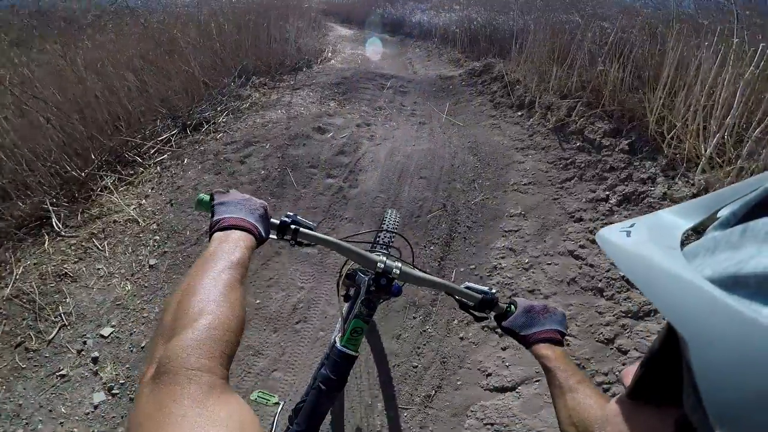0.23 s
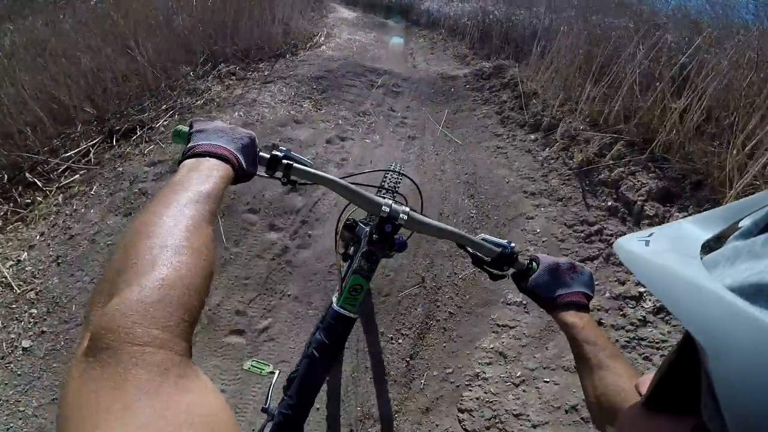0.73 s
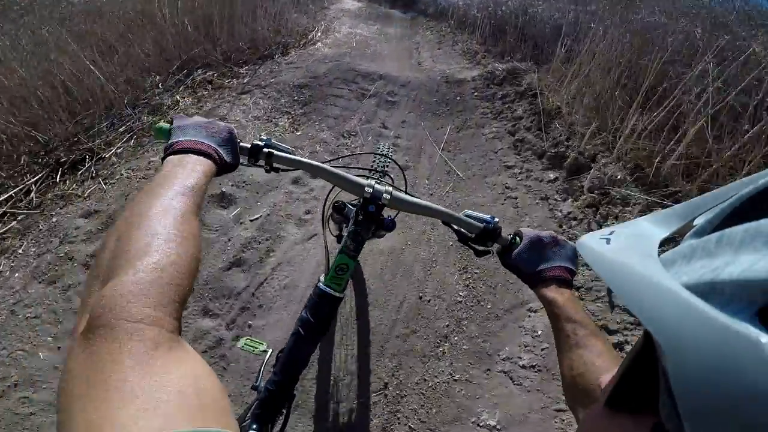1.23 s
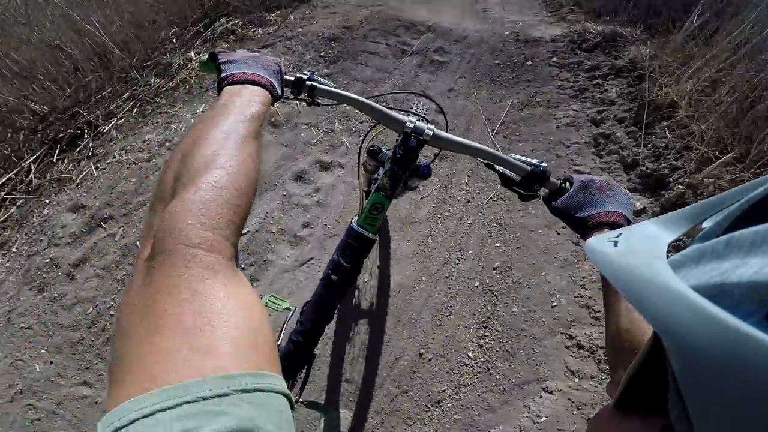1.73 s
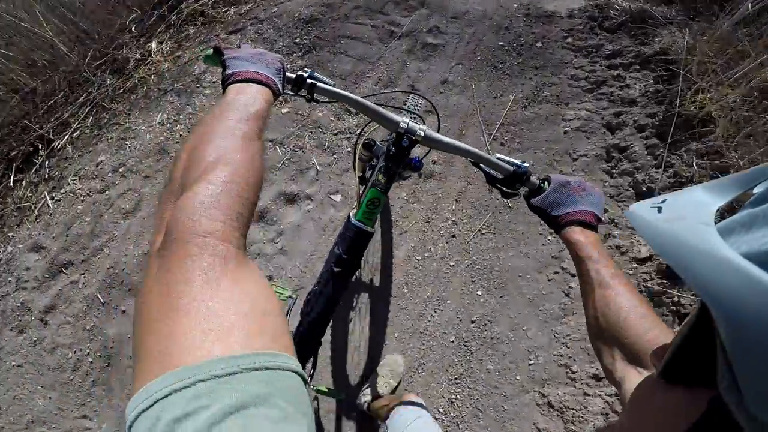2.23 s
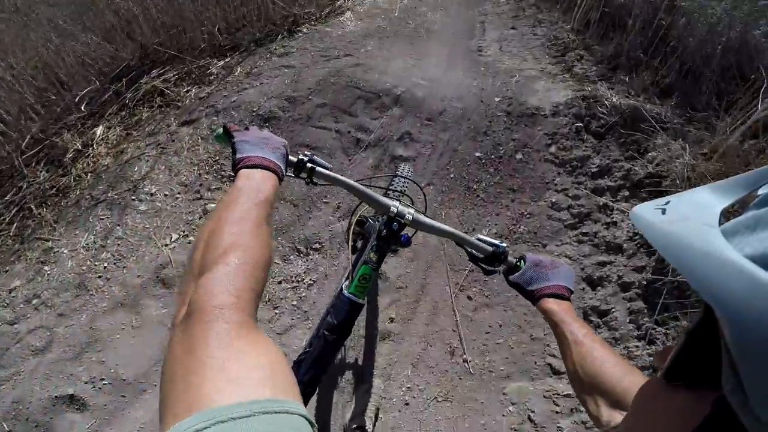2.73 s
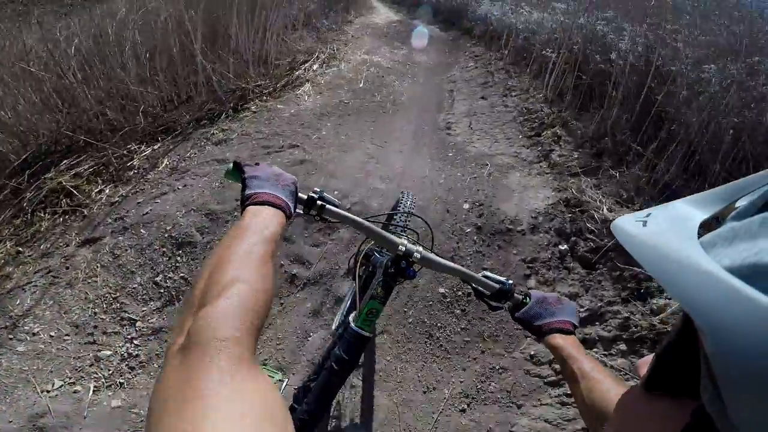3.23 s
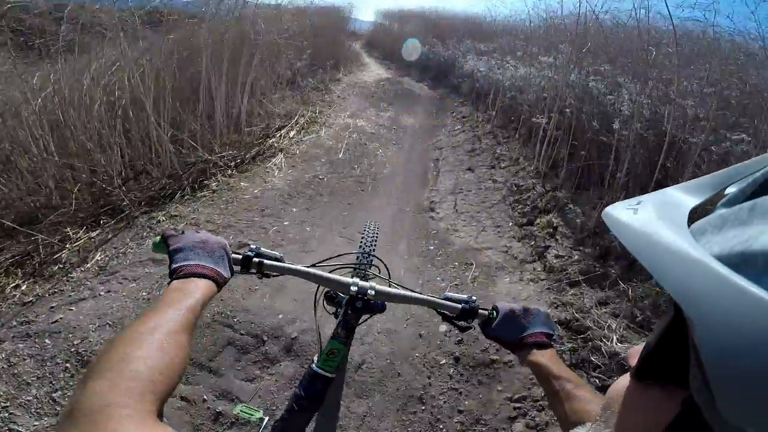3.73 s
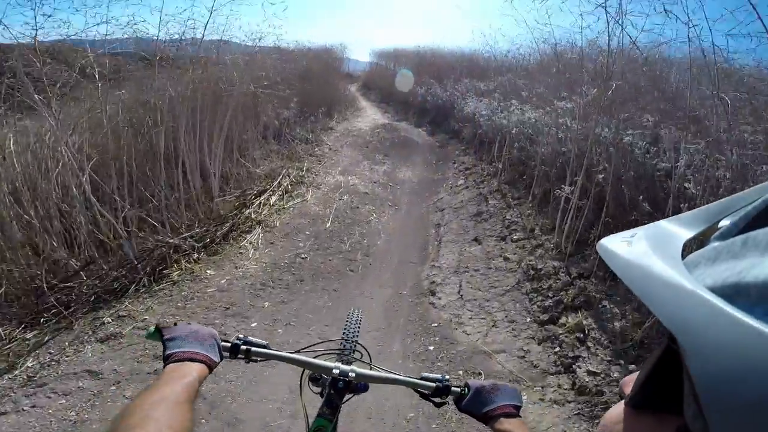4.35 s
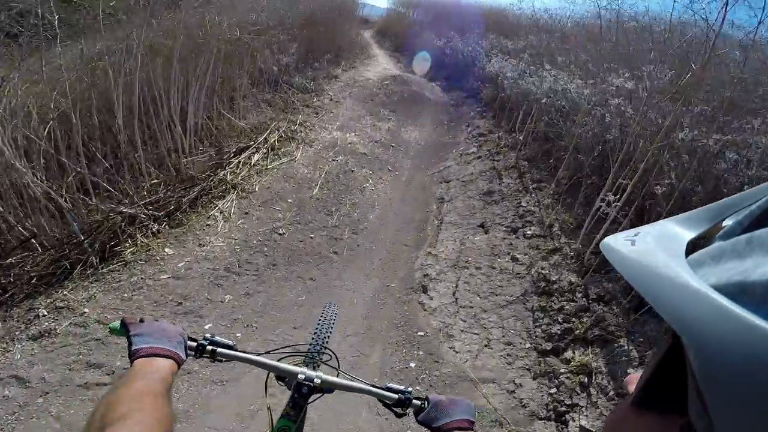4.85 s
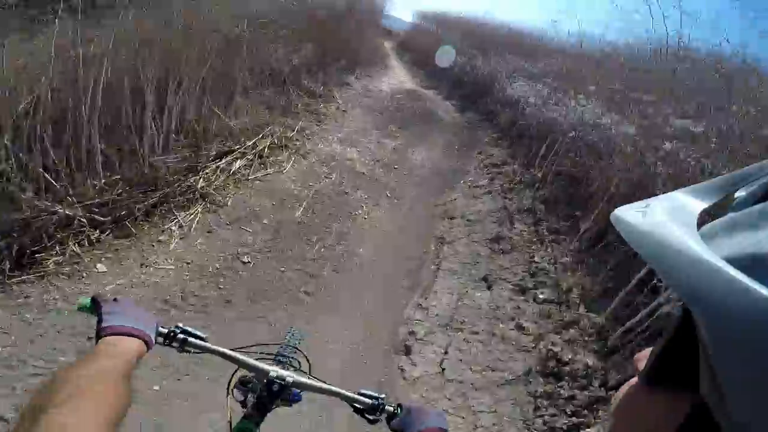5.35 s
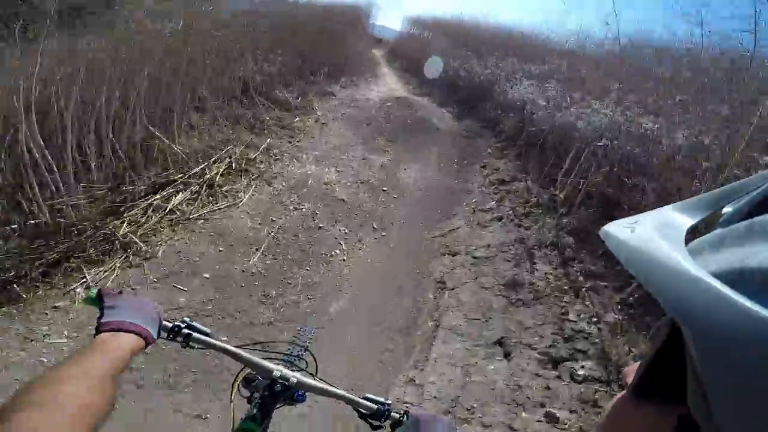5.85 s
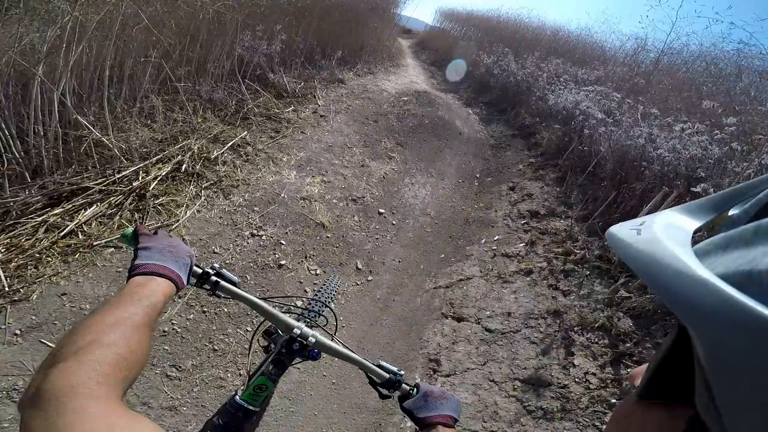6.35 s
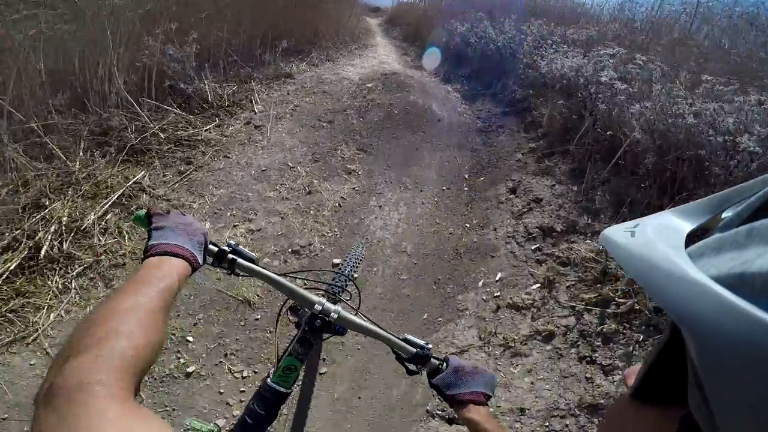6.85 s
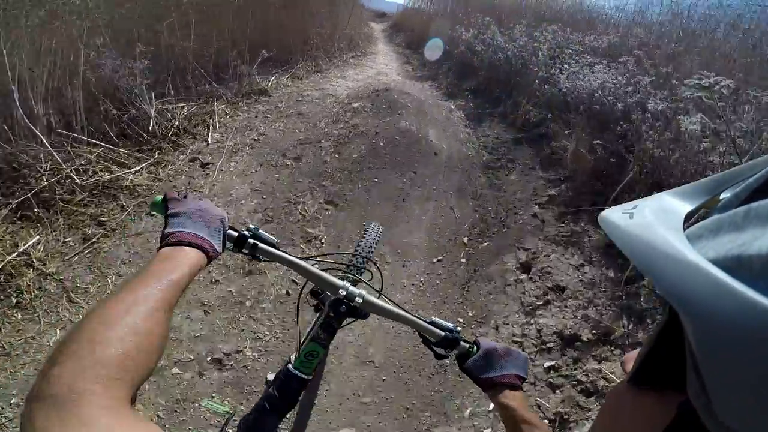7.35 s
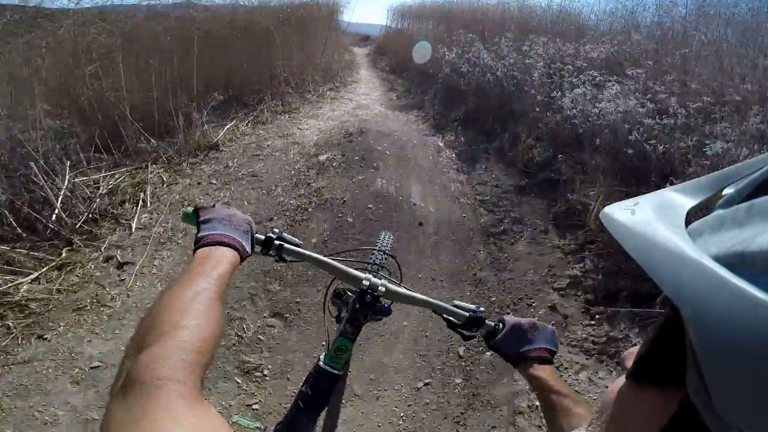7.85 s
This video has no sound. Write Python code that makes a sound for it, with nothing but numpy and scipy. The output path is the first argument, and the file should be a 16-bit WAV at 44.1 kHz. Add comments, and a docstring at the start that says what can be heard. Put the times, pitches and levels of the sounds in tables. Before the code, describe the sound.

On board a coasting bicycle, bright metallic ratchet clicks slow, quicken and slow again over faint gritty tyre noise, dull rattling knocks and buffeting wind.

```python
"""A bicycle freewheel ticks as a mountain bike coasts slowly down a dry dirt trail, heard from on board.
Each pawl drop is a snap of noise plus fading tones for the ringing hub and wheel.
Puffs of noise in a broad resonance are stones and cables knocking the frame; lumpy noise in three
pitch ranges is the tyres on grit. Wind heaves and buffets in low noise, with single pressure thumps."""
import sys
import numpy as np
from scipy import signal
from scipy.fft import rfft, irfft, next_fast_len
from scipy.io import wavfile
from scipy.ndimage import uniform_filter1d, map_coordinates

SR = 44100
rng = np.random.default_rng(int(sys.argv[2]) if len(sys.argv) > 2 else 0)


def materialize(psi):
    """Save the field psi as 16-bit PCM at rate SR to the path in sys.argv[1].

    A 1-D psi becomes a single channel; in a 2-D psi each row is a channel.
    """
    bounded = np.clip(np.atleast_2d(psi).T, -1, 1)
    quanta = np.round(bounded * 32767).astype(np.int16)
    wavfile.write(sys.argv[1], SR, quanta)


N = 357210  # length in samples

# freewheel pace: (time [s], pace [ticks per second])
TICK_PACE = [(0.0, 39.124), (0.775, 36.117), (1.425, 19.039), (1.65, 19.536), (1.75, 14.946),
             (1.95, 16.225), (2.425, 21.023), (2.55, 25.538), (2.725, 36.66), (2.825, 35.291),
             (3.125, 37.746), (3.2, 41.451), (3.625, 19.143), (3.75, 20.905), (4.2, 10.847),
             (4.425, 15.423), (4.5, 11.865), (4.85, 11.213), (5.225, 19.006), (5.475, 26.989),
             (5.575, 36.036), (5.75, 41.986), (5.8, 24.87), (5.95, 32.035), (6.125, 49.647), (6.3, 46.289),
             (6.65, 45.414), (7.35, 39.506), (7.525, 35.867), (7.8, 38.55), (8.1, 32.804)]
FIRST_TOOTH = .339  # share of a tooth's travel left before the first tick
# loudness of the ticks before their scatter: (time [s], snap level [dB], wheel ring level [dB])
TICK_LOUDNESS = [(0.0, -26, -42.5), (0.25, -34, -46), (0.95, -27.5, -48), (1.55, -35.5, -50),
                 (1.7, -31, -50.5), (2.25, -27, -43.5), (2.6, -37.5, -53), (2.8, -33.5, -47.5),
                 (3.25, -29, -47), (3.45, -28.5, -45), (3.75, -38, -53.5), (4.35, -31, -52),
                 (5.2, -41, -57), (5.45, -42.5, -50), (5.8, -36, -51), (6.15, -41.5, -51.5),
                 (6.4, -41, -53.5), (6.65, -32, -46.1), (6.8, -30, -49.5), (7.35, -39.5, -53.5),
                 (7.8, -28, -47), (8.1, -30.5, -49.5)]
STRONG_PAWL_DB = 0.5  # ticks lie this much above and below their level in turn
SNAP_SCATTER_DB, RING_SCATTER_DB = 1.0, 2.5  # from tooth to tooth
# ticks out of the even run; the extra replaces their random scatter:
# (time [s], delay [ms], extra snap [dB], extra wheel ring [dB])
ODD_TICKS = [(0.062, 2.5, -1.5, -4.5), (0.165, 1, 4, 5.5), (0.213, -2, 3.5, 2.5), (0.264, -2.5, 3.5, -2.5),
             (0.429, 1.5, -4.5, -11), (0.508, 1.8, -5, -2), (0.673, 4, 2.5, -2), (0.757, 5, 1, 1.0),
             (0.932, 5.4, -1.5, 2), (0.994, 4, 1.5, 9), (1.031, 7.2, 1.5, 4), (1.094, 1.2, 1.5, 7),
             (1.133, 3.5, 4, 7), (1.166, -1.5, -2, 5), (1.207, 0, 2.5, 8.5), (1.292, -0.2, 2.5, 1),
             (2.016, 1.5, 1, -3.0), (2.074, 0.5, -0.5, -4), (2.13, 0.6, -1, 3), (3.135, 2, 2, 5.0),
             (3.6, 2.7, 1.5, 1.5), (3.7, 0.7, 1.5, -3.0), (4.102, 1.5, 0.0, 6), (4.273, 2, 0, -0.5),
             (4.347, 0.4, 0, 4), (4.417, 3, 1, -17), (4.487, 1.2, 0.5, 4), (4.574, 3.5, 3.5, 2.5),
             (4.658, 1, 1.5, 7.5), (4.833, 1.9, -1, -0.5), (6.629, 3.3, 0, -2), (6.778, -2, 0.5, -6),
             (6.897, 1.8, 3.5, 4.0), (6.968, 4, -2.5, -1), (7.154, 0, -1, -13), (7.35, -4.5, 3, 5.5),
             (7.46, 1.3, -1, 5), (7.491, 6.5, 0.5, -2), (7.576, 8.5, 2, 0.0), (7.657, 7.5, 1.5, -4),
             (7.76, 4, -2.0, 3.5), (7.89, 1.5, -0.5, 8.5), (7.978, 7, 0.5, 5.5), (8.063, 5.5, -0.5, 2.5)]
# colour of the snap: (frequency [Hz], relative level per Hz [dB])
SNAP_COLOUR = [(400, -23.5), (1200, -23.5), (2500, -22.5), (3500, -11.5), (6200, -4.5), (6600, -1),
               (9000, -0.5), (13500, -5.5), (14300, -0.5), (14900, -4.5), (15500, -46), (16500, -52)]
# tones of the metal hub and cassette: (frequency [Hz], relative level [dB], time to fade 60 dB [s])
HUB_TONES = [(4255, -23, .2), (5400, -24, .07), (6000, -22, .07), (6650, -16, .12), (6869, -18, .06),
             (8193, -17, .05), (8790, -4, .06), (9351, -14, .06), (10360, -17, .08), (11200, -17, .12),
             (11900, -16, .06), (12800, -18, .11), (14270, -15, .15)]
# duller tones of the wheel: (frequency [Hz], relative level [dB], time to fade 60 dB [s])
WHEEL_TONES = [(1705, -12.5, 0.034), (2220, -5.5, 0.033), (2434, 2, 0.091), (2571, -5.5, 0.22),
               (2732, 3, 0.055), (1982, -8, 0.11)]

# knocks on the frame: (time [s], level [dB], centre [Hz], width [frequency ratio], kept within limits below)
FRAME_KNOCKS = [(.455, -42, 345, 4.8), (.499, -43, 380, 4.7), (0.902, -43, 427, 3.5), (.986, -33, 384, 2.5),
                (1.035, -26, 560, 1.3), (1.227, -36, 480, 2.4), (1.454, -22, 1660, 1.5),
                (1.526, -35, 450, 3.5), (1.541, -38, 700, 3), (2.097, -40, 307, 4.8),
                (2.143, -33.5, 450, 4), (2.431, -34, 530, 4.7), (2.758, -28, 704, 1.4),
                (3.215, -44, 1310, 2), (3.273, -49, 813, 1.8), (3.843, -47, 1040, 2.3),
                (4.085, -48.5, 700, 4), (4.292, -29, 1790, 1.5), (4.456, -40, 814, 2.2),
                (5.18, -49, 1150, 4.5), (5.23, -36, 304, 4.9), (5.734, -35, 1270, 4.4),
                (5.792, -42, 366, 5), (6.241, -43, 320, 5.4), (6.313, -20, 516, 2.9),
                (6.571, -48, 982, 1.9), (6.738, -41, 764, 4.1), (6.829, -43, 1260, 1.4),
                (7.132, -46, 1940, 2.9), (7.275, -37, 342, 4.3), (7.452, -37, 2190, 2.8),
                (7.644, -40, 2020, 1.8), (7.738, -38, 540, 2.1), (7.834, -33, 413, 2.4)]
MIDDLE_KNOCK_DB, MIDDLE_KNOCK_T60 = -36, 0.069  # a middling knock, and its time to fade 60 dB [s]
SHORTER_PER_DB = 0.11  # hard knocks die sooner
KNOCK_RISE_S = 0.0043  # for a knock at 500 Hz; higher ones start faster

# tyre loudness before its random sway: (time [s], crunch [dB], roll [dB], fine grit [dB])
TYRE_LOUDNESS = [(0.0, -58, -57.5, -48.5), (0.34, -59, -63.5, -55), (0.83, -56.5, -59, -51),
                 (1.2, -58.5, -59.5, -55), (1.58, -59.5, -61.5, -61), (1.98, -60.5, -62, -56.5),
                 (2.61, -55.5, -60, -58.5), (3.0, -55, -61.5, -54.5), (3.36, -51.5, -56.5, -52),
                 (3.7, -58.5, -60, -60), (3.95, -60, -61, -63.5), (4.29, -58, -56.5, -60.5),
                 (5.03, -64.5, -64, -65.5), (5.5, -60.5, -62.5, -61), (5.77, -58, -59, -57),
                 (6.11, -56.5, -64, -60), (6.56, -57.5, -57.5, -58), (6.75, -51.5, -59, -55.5),
                 (7.38, -59.5, -60, -58.5), (8.1, -53.5, -60, -52)]
# colour of the rolling tread: (frequency [Hz], relative level per Hz [dB])
ROLL_COLOUR = [(90, -15), (160, 0.5), (300, 1.5), (480, -2), (900, -47)]
# colour of the crushed dirt: (frequency [Hz], relative level per Hz [dB])
CRUNCH_COLOUR = [(250, -26), (600, 0.5), (1400, -1), (1700, 1), (2200, -5.5), (3000, -13), (6000, -68)]
# colour of the fine grit: (frequency [Hz], relative level per Hz [dB])
GRIT_COLOUR = [(1500, 3), (3000, 3), (6000, 1.5), (9000, -3), (14500, -8), (15500, -42)]

# wind on the microphone before its random sway: (time [s], buffet [dB], heave [dB])
WIND_LOUDNESS = [(0.0, -43.5, -34), (1.13, -50.5, -36.5), (1.26, -50, -36), (1.58, -50, -50),
                 (1.8, -51.5, -34), (2.12, -50, -38), (2.3, -47, -27), (2.57, -53.5, -42.5),
                 (3.07, -53, -35), (3.27, -50, -31), (3.47, -47, -27.5), (3.68, -53, -43),
                 (4.2, -47.5, -36), (4.46, -51.5, -29), (5.03, -58.5, -48), (5.32, -52, -27),
                 (5.53, -57, -42.5), (5.75, -50, -40), (5.91, -49.5, -38.5), (6.7, -49, -31.5),
                 (6.79, -50, -27.5), (7.76, -46.5, -35.5), (7.9, -39.5, -24.5), (8.1, -42.5, -39)]
# colour of the slow pressure heaves: (frequency [Hz], relative level per Hz [dB])
HEAVE_COLOUR = [(2, -8), (7, 0), (15, -5), (28, -14), (70, -40)]
# colour of the buffeting: (frequency [Hz], relative level per Hz [dB])
BUFFET_COLOUR = [(12, -23), (30, -4), (60, -6.5), (110, -15), (220, -34.5), (500, -54)]
# colour of torn, fluttering air: (frequency [Hz], relative level per Hz [dB])
FLUTTER_COLOUR = [(70, -11), (150, 6), (280, -3), (600, -17)]
# single blows: (time [s], peak before levelling off [dB], width scale [ms], push 1 or suction -1 [sign])
WIND_THUMPS = [(.197, -24.5, 10, 1), (0.556, -13, 6.9, 1), (0.878, -21, 17, -1), (.983, -13, 9.9, 1),
               (1.264, -23.5, 26, 1), (1.556, -5.5, 7.8, 1), (1.581, -16, 9.7, -1), (1.622, -22, 7.3, 1),
               (2.107, -30, 10, 1), (2.801, -19.5, 23, -1), (3.304, -21.5, 11.6, 1),
               (3.944, -18.5, 10.4, 1), (4.394, -26, 5.9, 1), (4.792, -31.5, 6.5, -1), (5.24, -17, 5.9, 1),
               (5.249, -16.5, 8.5, -1), (5.287, -20, 11.5, 1), (5.802, -22, 19, -1), (5.93, -23.5, 18, -1),
               (6.211, -16.5, 27, -1), (6.275, -20.5, 9.9, -1), (6.319, -15, 3.6, 1),
               (7.383, -7.5, 18.6, 1), (7.796, -16, 20, 1)]
# membrane pops inside one strong blow: (time [s], signed step [amplitude], recovery time constant [s])
MEMBRANE_POPS = [(7.3911, -0.071, 0.022), (7.433, 0.093, 0.0012)]
HEAVE_SWAY_DB = 2  # random sway of the slow pressure
TORN_DB = -18.5  # flutter that rides on the buffeting, against the buffet level
FLUTTER_DB, SURGE_DB, SURGE_S = -35, -12, 0.04  # torn air and slow surge around a blow, against its peak
TOP_HZ = 16494  # nothing higher is kept


def freewheel():
    """Each pawl drop is a sharp snap with a chattering tail that sets hub and wheel ringing."""
    out, t = np.zeros(N), np.arange(4096) / SR
    drops = ticks()
    rise = 1 - np.exp(-t / 0.00021)
    swell = 1 - np.exp(-t / 0.00014)  # the wheel takes a moment to respond
    crack = amp(-4.0 - 60 * t / 0.0039)
    body = amp(-7.5 - 60 * t / 0.013)
    chatter = amp(-13.5 - 60 * t / 0.049)
    fade = crack + body + chatter
    # every tooth has its own colour
    spectra = rfft(rng.standard_normal((len(drops), len(t))))
    lumps = uniform_filter1d(rng.standard_normal(spectra.shape), size=120, axis=1)
    noise = coloured(irfft(spectra * amp(1.78 * unit(lumps))), SNAP_COLOUR)
    for (s, snap_db, wheel_db), hiss in zip(drops, noise):
        hub = amp(-14) * ring(HUB_TONES, t, scatter_db=4, detune=.004, blur=.3)
        wheel = swell * ring(WHEEL_TONES, t, scatter_db=4.5, detune=0.045, blur=0.39)
        snap = struck(rise * (fade * hiss + hub), size=200)
        add(out, s, amp(snap_db) * snap + amp(wheel_db) * struck(wheel, size=500))
    return out


def ticks():
    """(time [s], snap [dB], wheel ring [dB]) of every pawl drop: one for each whole tooth that passes."""
    pace, = curves(TICK_PACE)
    teeth = np.cumsum(pace) / SR - FIRST_TOOTH  # teeth passed so far
    times = np.interp(np.arange(int(teeth[-1]) + 1), teeth, np.arange(N) / SR)
    extra_db = rng.standard_normal((len(times), 2)) * [SNAP_SCATTER_DB, RING_SCATTER_DB]
    for s, delay_ms, *own_db in ODD_TICKS:
        delay = delay_ms / 1000
        tooth = np.argmin(np.abs(times + delay - s))  # the tick that lands nearest once delayed
        times[tooth] += delay
        extra_db[tooth] = own_db
    extra_db[:, 0] += STRONG_PAWL_DB * (-1) ** np.arange(len(times))
    level_db = np.transpose(curves(TICK_LOUDNESS))[(times * SR).astype(int)]
    return np.c_[times, level_db + extra_db]


def ring(modes, t, scatter_db, detune, blur):
    """The tones struck once, each at a new strength and pitch; loose parts make the phase wander."""
    hz, db, t60 = np.transpose(modes)[..., None]
    draw = rng.standard_normal((3, len(modes), 1))
    pitch = hz * (1 + detune * draw[0])
    steps = np.cumsum(rng.standard_normal((len(modes), len(t) // 16 + 1)), axis=1)
    wander = blur * np.repeat(steps, 16, axis=1)[:, :len(t)]
    size = amp(db + scatter_db * draw[1]) * np.exp(-np.log(1000) * t / t60)
    return np.sum(size * np.sin(2 * np.pi * (pitch * t + draw[2]) + wander), axis=0)


def struck(sound, size):
    """A decaying sound scaled to an average (rms) strength of 1 over its first size samples."""
    return sound / np.sqrt(np.mean(sound[:size] ** 2))


def knocks():
    """Stones and cables knock the frame: a rattling puff of noise in a broad, dull resonance."""
    out, t = np.zeros(N), np.arange(SR // 8) / SR
    for s, db, hz, width in FRAME_KNOCKS:
        t60 = MIDDLE_KNOCK_T60 * np.exp(-SHORTER_PER_DB * (db - MIDDLE_KNOCK_DB))
        width = np.clip(width, 1.2, 4)
        far_above = min(hz * width ** 3.1, 15000)
        body = [(hz / 12, -18), (hz / width, -6), (hz, 0), (hz * width, -11), (far_above, -32)]
        # contact comes and goes, in steps of 128 samples
        contact_db = 2.2 * np.repeat(rng.standard_normal(len(t) // 128 + 1), 128)[:len(t)]
        puff = coloured(amp(contact_db) * rng.standard_normal(len(t)), body)
        rise = 1 - np.exp(-t * np.sqrt(hz / 500) / KNOCK_RISE_S)
        add(out, s, amp(db - 60 * t / t60) * rise * puff)
    return out


def tyres():
    """Tread rolls and crushes dirt: lumpy noise in three ranges, with small grains cracking in the crunch."""
    crunch_db, roll_db, grit_db = curves(TYRE_LOUDNESS)
    chance = 400 / SR * amp(6 * wobble(25))  # around 400 grains a second, in clusters
    grains = (rng.random(N) < chance) * rng.standard_normal(N)
    bump = wobble(16)  # uneven ground shakes the whole tyre
    roll = amp(roll_db + 1.3 * bump) * coloured(patchy(patchy_db=3.5), ROLL_COLOUR)
    crushing = unit(patchy(patchy_db=3.5)) + 0.82 * unit(grains)
    crunch = amp(crunch_db + 2.0 * bump) * coloured(crushing, CRUNCH_COLOUR)
    grit = amp(grit_db + 1.95 * wobble(8.2)) * coloured(patchy(patchy_db=4.5), GRIT_COLOUR)
    return roll + crunch + grit


def patchy(patchy_db):
    """Noise whose strength comes in small lumps of time and pitch."""
    z = signal.stft(rng.standard_normal(N), nperseg=256)[2]
    field = uniform_filter1d(rng.standard_normal(z.shape), size=5, axis=0)
    field = uniform_filter1d(field, size=6, axis=1)
    return signal.istft(z * amp(patchy_db * unit(field)), nperseg=256)[1][:N]


def wind():
    """Slow pressure heaves and lumpy buffeting, with single blows that push the membrane and let it swing back."""
    buffet_db, heave_db = curves(WIND_LOUDNESS)
    lumps_db = 3.5 * wobble(12)
    heave = coloured(rng.standard_normal(N), HEAVE_COLOUR)
    torn_size = amp(buffet_db + TORN_DB + 1.7 * lumps_db)
    torn = torn_size * coloured(rng.standard_normal(N), FLUTTER_COLOUR)
    heave_size = amp(heave_db + HEAVE_SWAY_DB * wobble(7.3) + lumps_db / 2)
    out = amp(buffet_db + lumps_db) * coloured(rng.standard_normal(N), BUFFET_COLOUR)
    t = np.arange(-SR // 10, SR // 10) / SR
    for s, db, width_ms, way in WIND_THUMPS:
        start = s + t[0]
        u = (t / (width_ms / 1000)) ** 2
        # a push one way with a dip the other way on both sides
        add(out, start, np.sign(way) * amp(db) * (1 - 1.33 * u) * np.exp(-u / 0.79))
        flutter = coloured(rng.standard_normal(len(t)), FLUTTER_COLOUR)
        add(out, start, amp(db + FLUTTER_DB) * np.exp(-(t / 0.029) ** 2) * flutter)
        add(heave_size, start, amp(db + SURGE_DB) * np.exp(-(t / SURGE_S) ** 2))
    out = out + heave_size * heave + torn
    top = .33  # the pressure swing levels off towards this on the strongest blows
    out = out / (1 + np.abs(out / top) ** 4) ** (1 / 4)
    for s, step, back in MEMBRANE_POPS:
        add(out, s, step * np.exp(-(t - t[0]) / back))
    return out


def amp(db):
    """Decibels to a plain multiplier."""
    return 10 ** (np.asarray(db) / 20)


def unit(x):
    """x scaled to an average (rms) strength of 1."""
    return x / np.sqrt(np.mean(x ** 2) + 1e-20)


def curves(rows):
    """One value per sample for each column after the time."""
    s, *cols = np.transpose(rows)
    return [np.interp(np.arange(N) / SR, s, c) for c in cols]


def wobble(rate):
    """A smooth random curve through rate random points a second."""
    points = rng.standard_normal(int(N * rate / SR) + 4)
    return map_coordinates(points, [np.arange(N) * rate / SR])


def coloured(x, points):
    """x filtered by a curve of (frequency [Hz], level [dB]) points, then brought to rms 1."""
    m = next_fast_len(x.shape[-1] + 8192)  # spare room keeps the end from wrapping onto the start
    hz, db = np.transpose(points)
    bins = np.log(np.fft.rfftfreq(m, 1 / SR) + 1)
    gain = amp(np.interp(bins, np.log(hz + 1), db, left=-120, right=-120))
    return unit(irfft(rfft(x, m) * gain, m)[..., :x.shape[-1]])


def add(track, s, sound):
    """Mix a sound into the track, in place, at time s in seconds."""
    part = track[max(round(s * SR), 0):][:len(sound)]
    part += sound[:len(part)]


def scene():
    """Everything reaches the one microphone in open air, so the sources simply add up."""
    return (freewheel() + knocks() + tyres() + wind())[None]


def record(dry):
    """Cut everything from the band limit upwards."""
    m = next_fast_len(N + 8192)
    kept = np.fft.rfftfreq(m, 1 / SR) < TOP_HZ
    return irfft(rfft(dry, m) * kept, m)[:, :N]


dry = scene()
out = record(dry)
materialize(out)
```